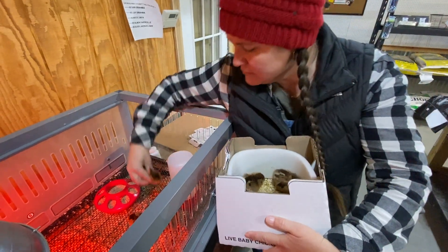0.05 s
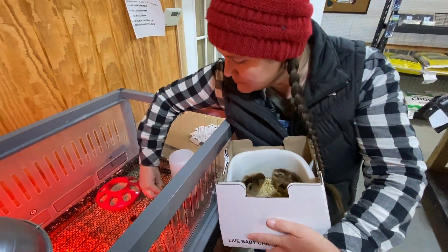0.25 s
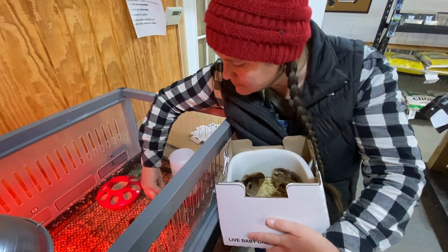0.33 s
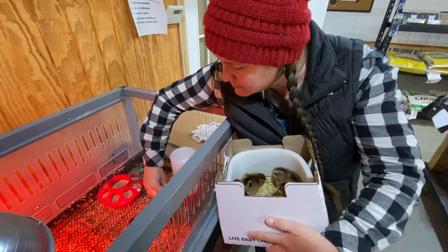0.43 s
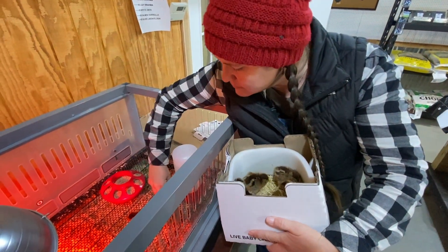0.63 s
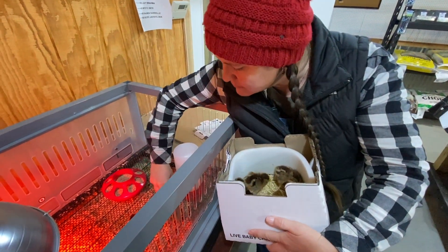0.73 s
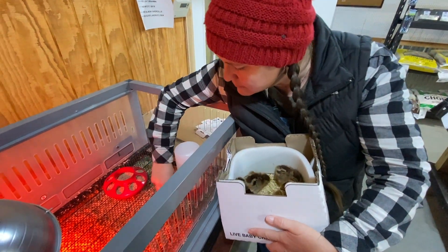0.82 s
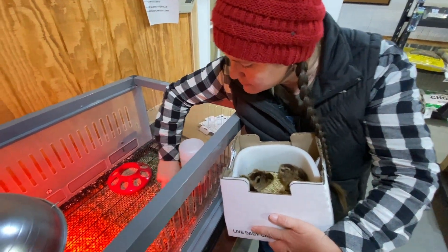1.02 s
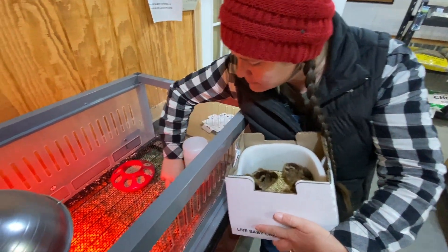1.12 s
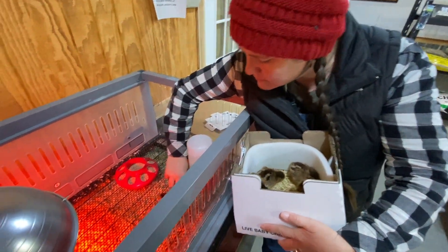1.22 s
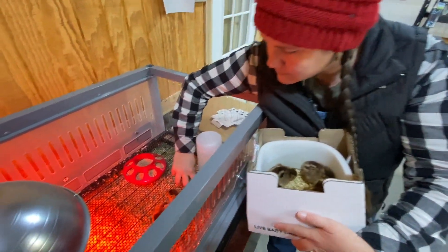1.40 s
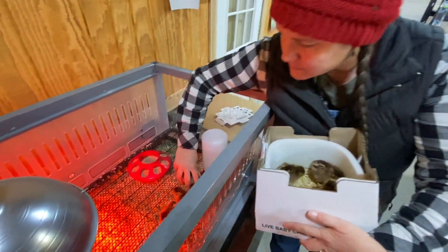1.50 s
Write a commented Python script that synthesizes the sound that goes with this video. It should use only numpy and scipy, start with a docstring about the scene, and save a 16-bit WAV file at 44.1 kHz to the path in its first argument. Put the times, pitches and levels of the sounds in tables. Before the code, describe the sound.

A flock of chicks chirps in overlapping high whistles while a hand lightly knocks the plastic tub.

```python
"""In a store, chicks peep in a plastic brooder and a cardboard box.
Each peep is a nearly pure whistle, a sine with two weak overtones; it mostly rises, holds and drops away.
A few near birds stand out of the flock, and the brooder walls and the room echo them as fading noise.
Below lies a low ventilation rumble made of coloured noise and fan tones.
A hand rubs (noise), taps (clicks) and knocks (ringing tones) inside the brooder."""
import sys
import numpy as np
from scipy import signal
from scipy.fft import rfft, irfft
from scipy.io import wavfile

SR = 44100
rng = np.random.default_rng(int(sys.argv[2]) if len(sys.argv) > 2 else 0)


def generate_wav(sig):
    """Save sig (samples, or channels by samples) to the path in sys.argv[1] as 16-bit PCM at SR."""
    pcm = np.round(np.clip(np.atleast_2d(sig).T, -1, 1) * 32767).astype(np.int16)
    wavfile.write(sys.argv[1], SR, pcm)


N = 68355
TIME = np.arange(N) / SR  # s


def amp(db):
    """Turns decibels into a gain."""
    return 10 ** (np.asarray(db) / 20)


def unit(x):
    """Scales a signal to an average strength (rms) of 1."""
    return x / np.sqrt(np.mean(x ** 2) + 1e-20)


def read(points, hz):
    """Reads a table at any pitch, with pitch on a log scale as the ear hears it."""
    table_hz, value = np.transpose(points)
    return np.interp(np.log(hz + 1), np.log(table_hz + 1), value)


def level(points):
    """Gain over time, drawn in straight dB lines through (s, dB) points."""
    return amp(np.interp(TIME, *np.transpose(points)))


def coloured(x, spectrum):
    """Filters with a colour whose mean power gain is 1."""
    gain = unit(amp(read(spectrum, np.fft.rfftfreq(N, 1 / SR))))
    return irfft(rfft(x) * gain, N)


def noise(spectrum):
    """Noise of rms 1 with the given colour."""
    return unit(coloured(rng.standard_normal(N), spectrum))


def drift(rate_hz):
    """Smooth random wandering of rms 1, weak above the given rate."""
    hz = np.fft.rfftfreq(N, 1 / SR)
    slow = rfft(rng.standard_normal(N)) / (1 + (hz / rate_hz) ** 2) ** 2
    return unit(irfft(slow, N))


def ventilation():
    """Moving air is steady low noise; the fan adds two tones whose phase wanders."""
    # colour of the moving air: (frequency [Hz], relative level [dB per Hz])
    air_colour = [(25, -11), (90, 0), (170, 3.5), (235, -3), (295, -5), (400, -13.5), (530, -15),
                  (900, -20), (1100, -21.5), (1280, -19.5), (1650, -21.5), (2200, -24), (4000, -49.5)]
    # fan tones: (frequency [Hz], rms level [dB])
    fan_tones = [(130, -62), (284, -67.5)]
    sound = amp(-59) * noise(air_colour)
    for hz, db in fan_tones:
        phase = 2 * np.pi * hz * TIME + 0.9 * drift(rate_hz=3.04)
        sound = sound + amp(db) * np.sqrt(2) * np.sin(phase)
    return sound


def rumble():
    """Low noise that comes and goes."""
    # colour of the rumble: (frequency [Hz], relative level [dB per Hz])
    rumble_colour = [(20, -35.5), (40, -25), (70, -1), (115, 2.5), (150, -15.5), (220, -17), (330, -36.5),
                     (600, -34.5), (2000, -56)]
    # swelling of the rumble: (time [s], level [dB])
    rumble_level = [(.04, -72.5), (.11, -50), (.35, -49), (.6, -57), (.72, -52), (.85, -56), (1.14, -48.5),
                    (1.26, -61), (1.31, -69)]
    return noise(rumble_colour) * level(rumble_level)


def distant_flock():
    """Far-off birds blur into a band of noise around their peeping pitch."""
    # colour of the far birds: (frequency [Hz], relative level [dB per Hz])
    distant_colour = [(1500, -25.5), (2300, -14.5), (3200, 2.5), (4400, 10), (5000, -9), (6000, -19.5),
                      (8000, -55)]
    # strength of the far birds: (time [s], level [dB])
    distant_level = [(0, -50), (.3, -58.5), (.55, -62.5), (.72, -52.5), (.8, -61), (1.1, -61), (1.3, -52),
                     (1.55, -66)]
    return noise(distant_colour) * level(distant_level)


def faint_hiss():
    """Broad, faint noise that fades and returns."""
    # colour of the hiss: (frequency [Hz], relative level [dB per Hz])
    hiss_colour = [(300, 12), (1000, 7), (2200, -8), (6000, 4.5), (8000, -2), (12000, -0.5), (15500, -5)]
    # strength of the hiss: (time [s], level [dB])
    hiss_level = [(0, -61.5), (.42, -64.5), (.62, -80.5), (.78, -92.5), (.9, -72), (1.55, -69)]
    return noise(hiss_colour) * level(hiss_level)


def store():
    """The floor of the store: all the sounds behind the birds, added together."""
    return ventilation() + rumble() + distant_flock() + faint_hiss()


def whistle(start, end, hz, db, second_db, third_db, flutter_db):
    """A chick's voice: a slightly unsteady sine with two weak overtones at 2 and 3 times its pitch."""
    # tilt of the overtones: (overtone frequency [Hz], gain [dB])
    overtone_colour = [(4500, -21), (6100, -6), (7000, 2), (8200, -3), (9400, -0.5), (11000, -1.5),
                       (12500, 1.5), (14500, -6)]
    edge_s = 0.0081  # soft onset and release
    waver, waver_hz = 0.0022, 130  # pitch wander as a share, and its rate
    flutter_hz, flicker_db = 110, 3.5  # rate of the level wander, and its extra size in each overtone
    overtone_follow = 0.56  # overtones swell less than the main tone
    dull_db, dull_s = -8.5, 0.023  # a peep starts purer and gains its overtones

    gate = np.clip(np.minimum(TIME - start, end - TIME) / edge_s + 0.5, 0, 1)
    on = gate > 0  # compute only where the bird sounds
    pitch = (hz * (1 + waver * drift(waver_hz)))[on]
    db = db[on]
    phase = 2 * np.pi * np.cumsum(pitch) / SR
    tone = amp(db) * np.sin(phase)

    overtone_db = db.max() + overtone_follow * (db - db.max())
    overtone_db = overtone_db + dull_db * np.exp(-abs(TIME[on] - start) / dull_s)
    for multiple, relative_db in [(2, second_db), (3, third_db)]:
        flicker = flicker_db * drift(flutter_hz)[on]
        colour_db = read(overtone_colour, multiple * pitch)
        gain = amp(overtone_db + relative_db + flicker + colour_db)
        tone = tone + gain * np.sin(multiple * phase)

    fade = np.sin(np.pi / 2 * gate[on]) ** 2
    flutter = amp(flutter_db * drift(flutter_hz)[on])
    out = np.zeros(N)
    out[on] = np.sqrt(2) * tone * fade * flutter
    return out


def flock_peep(start, length, main_hz, end_hz, lateness, db, loudest, second_db):
    """A quick scoop up to a main pitch, then a glide down or up to the end pitch, under one swell."""
    rise_share, rise_depth = 0.13, 0.05  # the scoop's share of the length and of the main pitch
    start_db, end_db = -17.5, -12.5  # the ends against the loudest moment
    progress = np.clip((TIME - start) / length, 0, 1)
    rise = np.maximum(1 - progress / rise_share, 0)
    glide = np.maximum(progress - rise_share, 0) / (1 - rise_share)
    scoop_hz = main_hz * (1 - rise_depth * rise ** 2)
    hz = scoop_hz - (main_hz - end_hz) * glide ** lateness
    swell_db = np.interp(progress, [0, loudest, 1], [start_db, 0, end_db])
    return whistle(start, start + length, hz, db + swell_db, second_db, third_db=-40.5, flutter_db=3.3)


def flock():
    """The many birds of the flock, each peep a simple swooping whistle."""
    # peeps: (start [s], length [s], main pitch [Hz], end pitch [Hz], lateness of the glide [power],
    # level before the flock's gain [dB], loudest moment [share of length],
    # second harmonic before colour and flicker [dB])
    flock_table = [ (-.04, 0.047, 3370, 2724, 1.77, -33.5, 0.88, -14),
                   (0.098, 0.1, 4090, 4065, 1.6, -45, .4, -34),
                   (0.184, .042, 3950, 3400, 1.5, -43, 0.2, -24),
                   (0.256, 0.048, 2706, 2430, 1.7, -53.5, 0.74, -30),
                   (0.264, 0.13, 3880, 2890, 10.8, -36.5, 0.97, -28),
                   (0.275, 0.08, 6280, 5540, 1.7, -46.5, 0.38, -25),
                   (0.318, .014, 5550, 4520, 1.24, -34, 0.61, -37),
                   (0.364, 0.016, 5730, 3670, 1.2, -33.5, .75, -24),
                   (0.373, 0.057, 3850, 2660, 2, -28, 0.24, -23),
                   (0.443, 0.043, 3256, 2950, 2.9, -45, 0.58, -34),
                   (0.456, 0.072, 4250, 3400, 1.6, -43.5, 0.28, -27),
                   (0.48, 0.04, 3820, 3040, 1.8, -43, 0.66, -33),
                   (0.646, 0.031, 3290, 2900, 2.04, -44, 0.52, -35),
                   (0.809, 0.078, 6020, 4930, 3.8, -51, 0.47, -16.5),
                   (.845, 0.084, 3963, 2780, 2.5, -38, 0.34, -23),
                   (.915, 0.047, 3574, 2800, 1.63, -39, .4, -12),
                   (.918, 0.07, 3860, 3010, 5.4, -40, 0.83, -29),
                   (0.902, 0.016, 4550, 4350, 1.8, -35, 0.94, -30),
                   (0.905, 0.015, 5300, 3740, 1.4, -42, 0.79, -32),
                   (1.077, 0.043, 4690, 4500, 1.4, -41.5, 0.84, -35),
                   (1.126, 0.039, 4250, 3800, 1.34, -32.5, .4, -45),
                   (1.162, 0.0268, 3740, 3124, 1.1, -32.5, 0.26, -47),
                   (1.146, .069, 5190, 2880, 1.5, -32.5, 0.75, -30),
                   (1.185, 0.17, 4020, 3970, 3.5, -47, 0.42, -29),
                   (1.295, 0.089, 4020, 2820, 1.9, -36.5, 0.59, -28.5),
                   (1.326, 0.11, 5015, 2905, 1.6, -35, 0.9, -34),
                   (1.408, 0.13, 5860, 5350, 1.5, -49, 0.28, -22.5),
                   (1.504, 0.013, 5450, 3500, 1.8, -37.5, 0.71, -23.5),
                   (1.513, 0.05, 3705, 2790, 1.6, -38, 0.54, -7),
                   (1.517, 0.021, 5400, 6300, 0.84, -57, 0.61, -26)]
    return amp(-1.5) * sum(flock_peep(*row) for row in flock_table)


def near_peep(points, second_db, third_db):
    """A close bird, whose whistle follows its own path of pitch and level."""
    s, hz, db = np.transpose(points)
    pitch = np.interp(TIME, s, hz)
    level_db = np.interp(TIME, s, db)
    return whistle(s[0], s[-1], pitch, level_db, second_db, third_db, flutter_db=1)


def short_peeps():
    """Near birds giving shorter whistles."""
    # one list per peep: (time [s], pitch [Hz], level before the group's gain [dB])
    short_paths = [
        [(0.083, 4473, -61), (0.094, 4946, -43), (0.108, 5085, -51), (0.118, 4820, -35.5), (0.145, 4740, -40),
         (0.163, 4410, -30.5), (0.177, 4240, -45), (0.184, 3550, -34), (0.191, 3080, -60)],
        [(0.325, 4630, -49), (0.338, 5200, -38.5), (0.348, 4895, -29), (0.375, 4772, -25.4), (0.402, 4653, -27),
         (0.414, 4589, -36.5), (0.431, 4473, -17), (0.443, 4293, -27.5), (0.46, 3770, -31.5),
         (0.474, 3300, -36), (0.483, 2695, -45.5)],
        [(0.484, 4600, -61), (0.497, 5230, -44), (0.513, 5350, -62), (0.53, 4800, -39.5), (0.56, 4630, -34.5),
         (0.574, 4190, -31.5), (0.587, 3747, -35.5), (0.601, 2980, -40.5)],
        [(0.935, 4545, -55), (0.957, 4770, -43.5), (0.975, 4645, -43.5), (0.995, 4550, -27.8),
         (1.015, 4437, -24.5), (1.035, 4240, -33), (1.048, 3940, -41.5), (1.06, 3610, -33.5),
         (1.071, 3019, -70)],
    ]
    # one row per peep, before colour and flicker: (second harmonic [dB], third harmonic [dB])
    short_overtones = [(-21, -42), (-37, -44), (-28, -47), (-30, -42)]
    peeps = [near_peep(path, *overtones) for path, overtones in zip(short_paths, short_overtones)]
    return amp(-1.05) * sum(peeps)


def long_peeps():
    """Near birds giving longer whistles."""
    # one list per peep: (time [s], pitch [Hz], level before the group's gain [dB])
    long_paths = [
        [(0.148, 4950, -41), (0.175, 5310, -55), (0.21, 5366, -33), (0.255, 5386, -32), (0.274, 5430, -31.5),
         (0.28, 5230, -39), (0.284, 4920, -17.5), (0.292, 4330, -28.5), (0.301, 4046, -22.5),
         (0.309, 3280, -34.8), (0.323, 2835, -33), (0.335, 2100, -59.9)],
        [(0.598, 4455, -47), (0.617, 5145, -35), (0.635, 5296, -30), (0.665, 5516, -27), (0.7, 5615, -29.5),
         (0.735, 5670, -31.5), (0.745, 5550, -23.5), (0.77, 5608, -24.5), (0.778, 5360, -22),
         (0.786, 5497, -23), (0.801, 5380, -24.5), (0.805, 4952, -17), (0.812, 5066, -19.5), (0.82, 5212, -17),
         (0.827, 5096, -17), (0.833, 4460, -21), (0.838, 3820, -26.5), (0.847, 4040, -24.5), (0.853, 4130, -41),
         (0.859, 3720, -20.5), (0.865, 2860, -35), (0.872, 2374, -40.5)],
        [(1.051, 2546, -42), (1.055, 3028, -38.5), (1.062, 4093, -40), (1.068, 4907, -27.5),
         (1.085, 5242, -19.5), (1.1, 5360, -29), (1.122, 5380, -33.5), (1.14, 5305, -27.5),
         (1.156, 5382, -33.5), (1.166, 5290, -23), (1.2, 5180, -26), (1.219, 5358, -30.5), (1.231, 5015, -26),
         (1.247, 5140, -28), (1.258, 4770, -27), (1.263, 4090, -33.0), (1.27, 3788, -18.5),
         (1.283, 2990, -41.5)],
    ]
    # one row per peep, before colour and flicker: (second harmonic [dB], third harmonic [dB])
    long_overtones = [(-37, -49.5), (-41.5, -68), (-31, -49)]
    peeps = [near_peep(path, *overtones) for path, overtones in zip(long_paths, long_overtones)]
    return amp(-1.28) * sum(peeps)


def echoes(x):
    """Blurs sound with fading noise: a short patter off the brooder walls and a longer room tail."""
    # time the room takes to fade by 60 dB: (frequency [Hz], time [s])
    room_fade = [(300, 0.43), (3500, 0.443), (5500, .42), (12000, 0.54)]
    walls_s = 0.0088  # time for the patter to fade to about a third
    walls = rng.standard_normal(N) * np.exp(-TIME / walls_s) * (TIME > 0.002)
    # split the tail into bands, so that each fades at its own speed
    tail_noise = rng.standard_normal(N) * (TIME > 0.008)
    hz, t, bands = signal.stft(tail_noise, SR, nperseg=256)
    fade = amp(-60 * t / read(room_fade, hz)[:, None])
    tail = signal.istft(bands * fade, SR, nperseg=256)[1][:N]
    response = (amp(-14) * unit(walls) + amp(-25.5) * unit(tail)) / np.sqrt(N)
    return signal.fftconvolve(x, response)[:N]


def knock(s, db):
    """A dull knock makes the plastic tub ring briefly at a few pitches."""
    # ringing of the tub: (frequency [Hz], level against the knock [dB], time to fade by 60 dB [s])
    tub_rings = [(88, 7.5, 0.055), (542, 0.5, 0.1), (642, -3.5, .05), (1056, -6.5, 0.088)]
    t = np.maximum(TIME - s, 0)
    return sum(amp(db + ring_db - 60 * t / t60) * np.sin(2 * np.pi * hz * t) for hz, ring_db, t60 in tub_rings)


def rub():
    """A hand sliding on plastic makes soft noise that swells and fades."""
    # colour of the rubbing: (frequency [Hz], relative level [dB per Hz])
    rub_colour = [(200, -18.5), (700, -18.5), (1100, -16.5), (1270, -0.5), (1450, -13), (1800, -17.5),
                  (2600, -25.5), (8000, -33.5)]
    # strength of the rubbing: (time [s], level [dB])
    rub_level = [(.78, -87), (.82, -68.5), (.9, -71.5), (.98, -59), (1.02, -62), (1.06, -61.5), (1.14, -63),
                 (1.2, -79.5), (1.3, -81)]
    return noise(rub_colour) * level(rub_level)


def tap(s, db):
    """A sharp contact (a click) and the quickly fading rattle that follows it."""
    decay_s = 0.00093
    age = TIME - s
    click = np.sinc(age * SR)
    rattle = rng.standard_normal(N) * (age >= 0) * np.exp(-abs(age) / decay_s)
    return amp(db) * (amp(13.5) * click + amp(2) * rattle)


def hand():
    """A hand in the brooder: dull knocks, a soft rub and a few light taps on the plastic."""
    # soft knocks on the tub: (time [s], level before the tub's ringing levels [dB])
    knock_table = [(.648, -55), (.809, -64), (1.126, -60), (1.254, -53), (1.262, -57)]
    # light taps: (time [s], level before click and rattle gains [dB])
    tap_table = [(0.807, -59), (1.256, -51), (1.262, -41.5)]
    # colour of the taps: (frequency [Hz], relative level [dB per Hz])
    tap_colour = [(150, -14), (400, -11), (700, 7.5), (1100, 4), (2500, -2.5), (6000, -24), (12000, -15),
                  (16000, -20)]
    knocks = sum(knock(*row) for row in knock_table)
    taps = coloured(sum(tap(*row) for row in tap_table), tap_colour)
    return knocks + rub() + taps


def scene():
    """Birds and hand with their echoes, over the store's floor."""
    floor = store()
    many = flock()
    short, long = short_peeps(), long_peeps()
    handling = hand()
    # the flock and the shorter near peeps carry more echo than the longer peeps
    wet = echoes(amp(6.5) * many + amp(6.5) * short + amp(3) * long + handling)
    return (floor + many + short + long + handling + wet)[None]


def record(dry):
    """The microphone's bass cut and the recorder's upper band limit."""
    low_cut_hz, high_cut_hz = 33, 15850
    bass_cut = signal.butter(3, low_cut_hz, "highpass", fs=SR, output="sos")
    thin = signal.sosfilt(bass_cut, dry)
    band_limit = signal.firwin(511, high_cut_hz, window=("kaiser", 9), fs=SR)
    return signal.oaconvolve(thin, band_limit[None], "same")


dry = scene()
out = record(dry)
generate_wav(out)
```